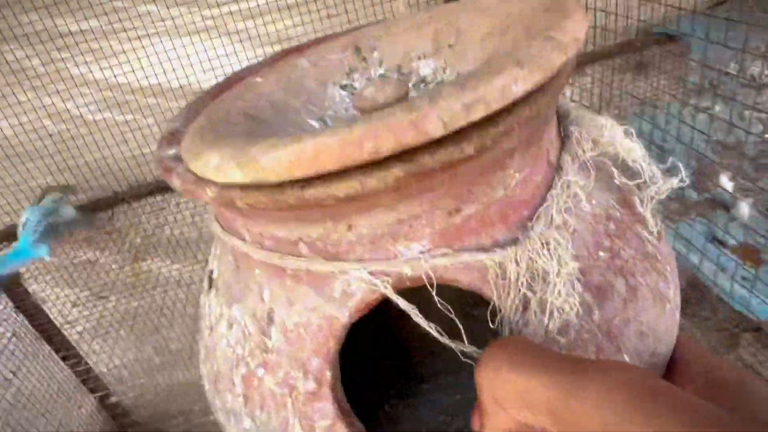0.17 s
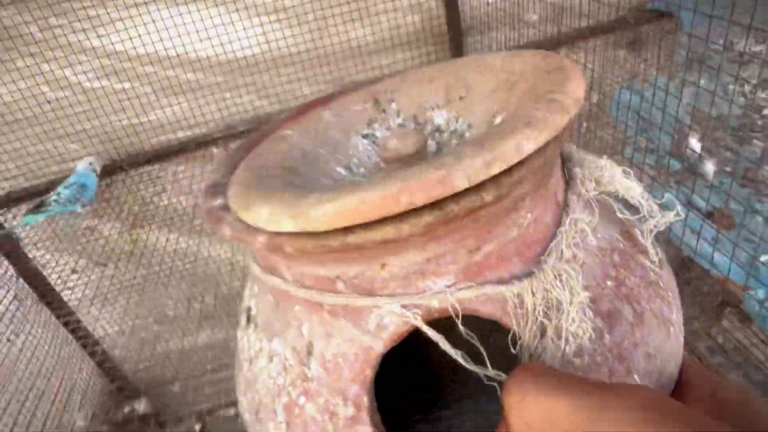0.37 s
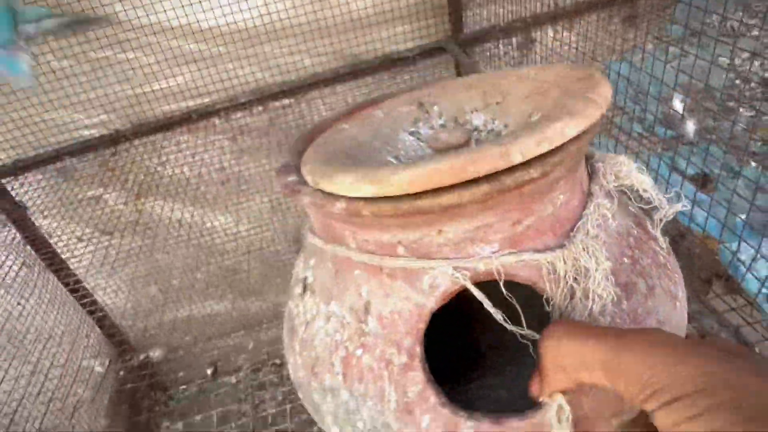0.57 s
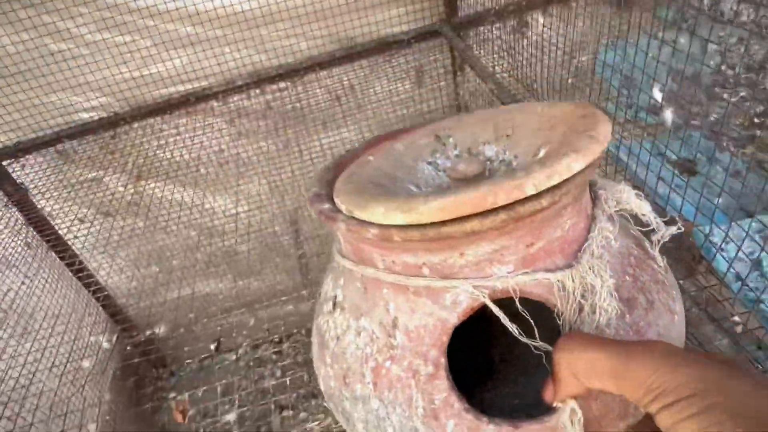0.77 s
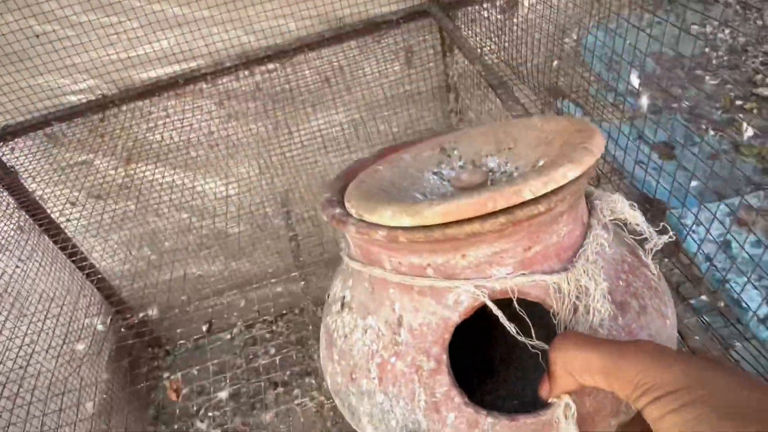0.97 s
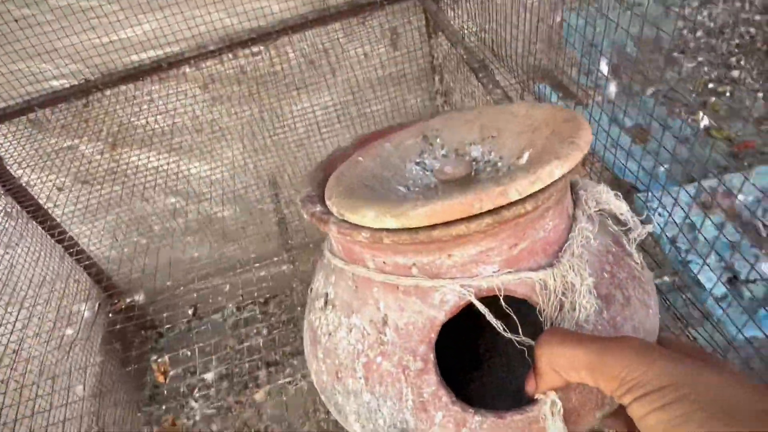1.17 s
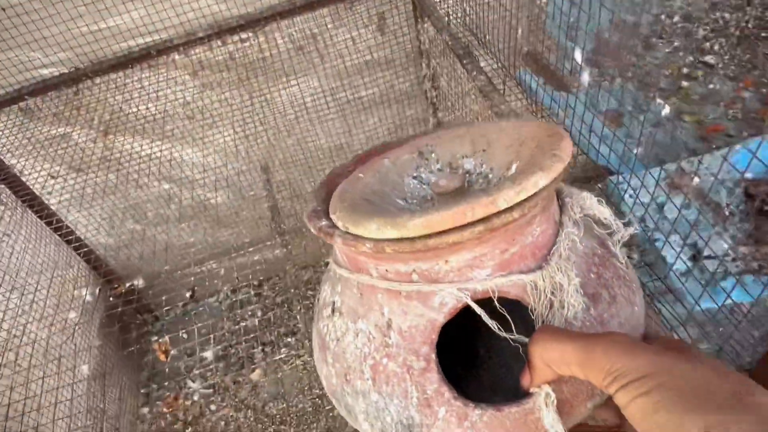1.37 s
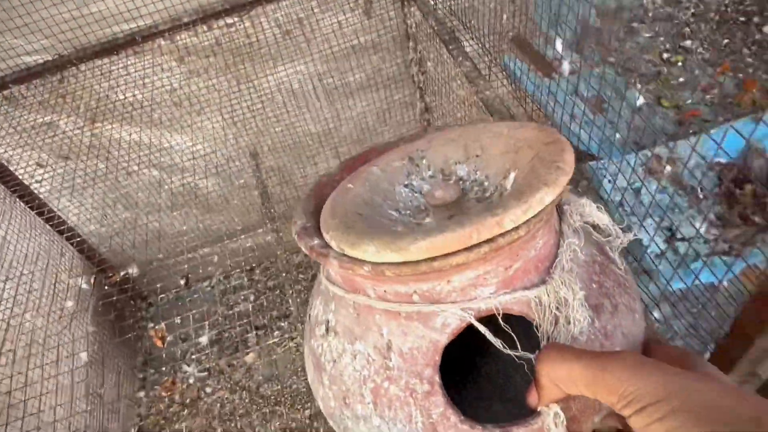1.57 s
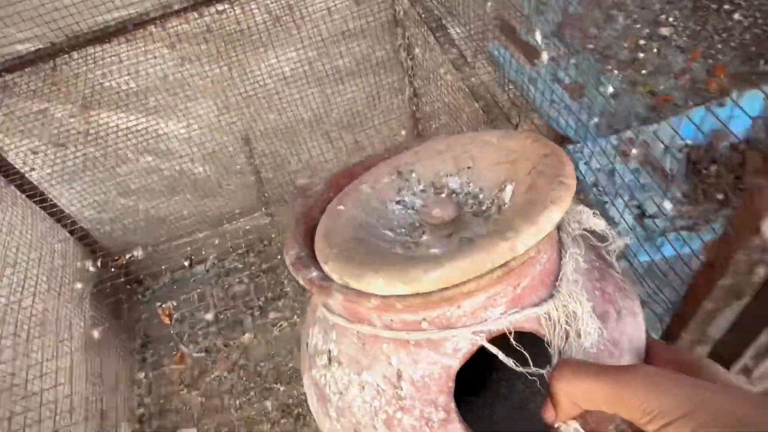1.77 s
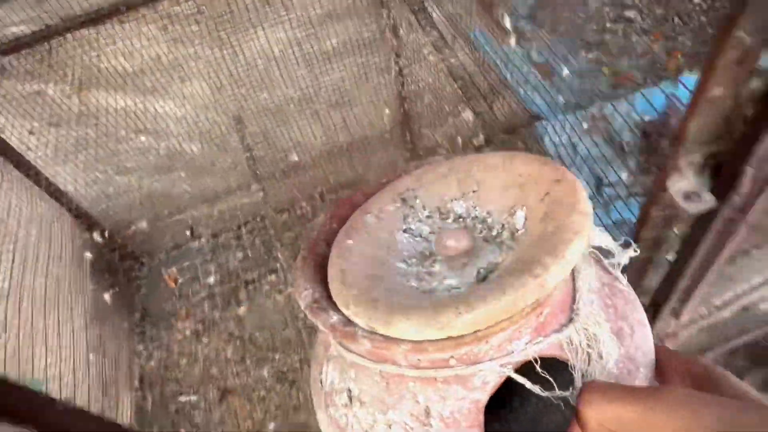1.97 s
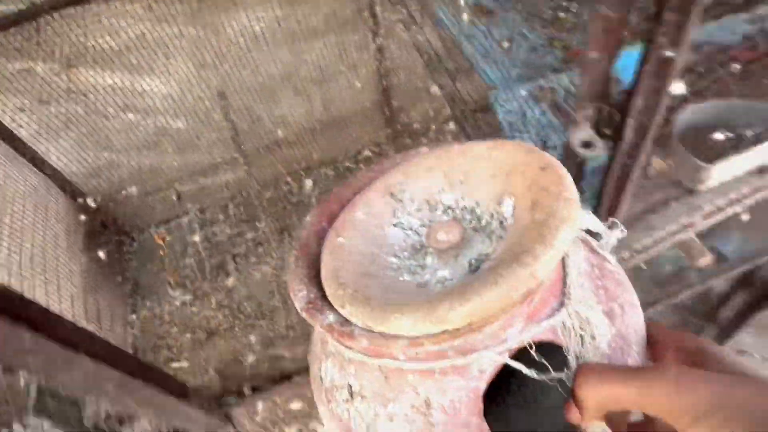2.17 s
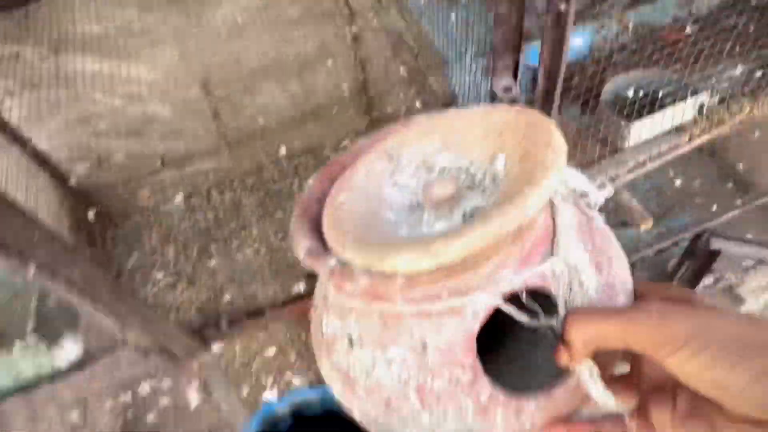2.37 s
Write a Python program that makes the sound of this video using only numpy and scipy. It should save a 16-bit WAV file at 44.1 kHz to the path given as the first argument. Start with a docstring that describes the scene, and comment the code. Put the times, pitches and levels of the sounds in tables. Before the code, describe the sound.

Chicks call from a clay pot at about 0.55, 0.9 and 1.4 seconds, each sharp high note breaking into a falling hoarse squawk; the last two start with dry rasps. Wings thrum away during 0-0.7, with scratches near 0.4. A faint chirp rises at 1.1; gritty rattling and scuffling span 1.3-1.55. Quiet outdoor air and low rumble remain, a faint tone at 1.8, a light knock at 2.27.

```python
"""In a wire aviary, chicks call three times from a clay pot over quiet outdoor air, rumble and hum.
Each call is a harmonic series that starts high (the louder two after a dry rasp of noise), breaks to a
lower register and turns hoarse as it sinks. A bird flutters away in decaying thrums at the start; another
gives a faint rising chirp. Noise makes scratches, scuffling and a resonant rattle around the third call;
a far tone sinks slightly and a light knock rings one mode."""
import sys
import numpy as np
from scipy import signal
from scipy.fft import rfft, irfft, next_fast_len
from scipy.io import wavfile
from scipy.ndimage import uniform_filter1d, minimum_filter1d

SR = 44100
rng = np.random.default_rng(int(sys.argv[2]) if len(sys.argv) > 2 else 0)


def wav_record(signal):
    """Record a signal, one row per channel, as 16-bit PCM in the file named by sys.argv[1]."""
    frames = np.transpose(np.atleast_2d(signal))
    bounded = np.clip(frames, -1, 1)
    # unit amplitude maps onto the largest positive 16-bit level
    quanta = np.round(bounded * 32767).astype(np.int16)
    wavfile.write(sys.argv[1], SR, quanta)


N = 106060
T = np.arange(N) / SR  # time in seconds
CUTOFF_HZ = 15900  # top of the audible band here
HIGH_ROUGHNESS = .08  # least hoarseness of the high notes and the chirp (0-1)

# Spectrum of rustling air and feathers. Each row: frequency in Hz, relative level in dB.
RUSTLE_COLOUR = [(120, -56), (200, -15), (289, -15.5), (366, -8), (548, -14.5), (709, -10), (3430, -20.5),
                 (6760, -18.5), (9930, -26.5), (16000, -32)]


def from_db(db):
    """Level is logarithmic: 20 dB is a tenfold amplitude."""
    return 10 ** (np.asarray(db) / 20)


def rms_one(x):
    """Normalisation by effective value: scale to unit rms."""
    return x / np.sqrt(np.mean(x ** 2) + 1e-20)


def at_hz(points, hz):
    """Interpolation of a spectrum in dB along a logarithmic frequency axis."""
    point_hz, db = np.transpose(points)
    return np.interp(np.log(np.maximum(hz, 1)), np.log(point_hz), db)


def shaped(x, gain_at):
    """Linear filtering: multiply the spectrum by a gain that depends on frequency."""
    size = next_fast_len(2 * x.shape[-1])
    hz = np.arange(size // 2 + 1) * SR / size
    return irfft(rfft(x, size) * gain_at(hz), size)[..., :x.shape[-1]]


def noise(colour, channels=1):
    """Coloured noise: white noise filtered to a spectrum that falls away past its ends, at unit rms."""
    lowest_hz, highest_hz = colour[0][0], colour[-1][0]

    def gain(hz):
        top = 1 / (1 + (hz / highest_hz / 2) ** 4)
        bottom = 1 - 1 / (1 + (2 * hz / lowest_hz) ** 4)
        return from_db(at_hz(colour, hz)) * top * bottom

    return rms_one(shaped(rng.standard_normal((channels, N)), gain))


def drift(hz):
    """Band-limited random wander: low-passed noise of unit rms."""
    low_pass = signal.butter(2, hz, fs=SR, output="sos")
    settled = signal.sosfilt(low_pass, rng.standard_normal(N + SR))[SR:]  # first second discarded
    return rms_one(settled)


def bursts(rows, rise_s):
    """Impulsive excitation: envelopes that rise quickly and decay exponentially, superposed."""
    out = 0
    for s, db, decay_s in rows:
        age = np.maximum(T - s, 0)
        rise = 1 - np.exp(-age / rise_s)
        decay = np.exp(-np.maximum(age - rise_s, 0) / decay_s)
        out = out + from_db(db) * rise * decay
    return out


def background():
    """Incoherent superposition: outdoor air, rustling hiss and low rumble as noise, plus a steady sine hum."""
    # Quiet air. Each row: frequency in Hz, relative level in dB.
    air_floor_colour = [(120, -38), (200, -18.5), (590, -3.5), (696, -21.5), (1160, -9), (2910, -13.5),
                        (9000, -33), (16000, -56)]
    # Rustling hiss. Each row: time in seconds, level in dB before wander and balance.
    hiss_level = [(0, -41.5), (.45, -45), (.75, -52.5), (1.1, -56), (1.25, -52.5), (1.6, -58.5),
                  (1.87, -62), (1.95, -52), (2.05, -58), (2.17, -57), (2.28, -55), (2.4, -59)]
    # Low rumble. Each row: time in seconds, level in dB before a common trim.
    rumble_level = [(0.0, -31.5), (0.11, -43), (0.17, -39), (0.39, -46.5), (0.51, -41.5), (0.75, -50),
                    (2.12, -54.5), (2.32, -47), (2.4, -49.5)]
    # Low rumble. Each row: frequency in Hz, relative level in dB.
    rumble_colour = [(12, -33.5), (20, -19), (54, 3.5), (113, -9.5), (193, -10.5), (255, -17), (307, -14.5),
                     (400, -17.5), (520, -18), (880, -120)]
    floor_db, rumble_trim_db = -60.5, -2.5
    hum_hz, hum_peak_db = 46.2, -50.5

    floor = from_db(floor_db) * noise(air_floor_colour, channels=2)
    hiss_db = np.interp(T, *np.transpose(hiss_level)) + 2.0 * drift(43)
    balance = from_db([[1.5], [-1.5]])  # left, right
    hiss = noise(RUSTLE_COLOUR, channels=2) * from_db(hiss_db) * balance
    # mostly common to both sides, with a weaker independent part
    rumble = noise(rumble_colour) + from_db(-10) * noise(rumble_colour, channels=2)
    rumble = rumble * from_db(np.interp(T, *np.transpose(rumble_level)) + rumble_trim_db)
    hum = from_db(hum_peak_db) * np.sin(2 * np.pi * hum_hz * T)
    return floor + hiss + rumble + hum


def wings():
    """Damped oscillation: each wing stroke is a short hollow thrum with a noisy swish of feathers."""
    # Up and down strokes. Each row: time in seconds, relative level in dB.
    wingbeats = [(0.064, -30), (0.1, -37.5), (0.15, -33.5), (0.186, -39), (0.244, -33), (0.321, -35),
                 (0.398, -34.5), (0.434, -43.5), (0.467, -37), (0.531, -38.5), (0.602, -44.5),
                 (0.666, -46.5), (0.708, -45.5)]
    thrum_hz, decay_s, rise_s = 367, 0.012, 0.0037
    thrum_db, swish_db, trim_db = 5, -10.5, -3  # the trim applies to both

    out = 0
    swish = from_db(swish_db) * noise(RUSTLE_COLOUR)[0]
    for s, db in wingbeats:
        start = s - rise_s
        thrum = from_db(thrum_db) * np.sin(2 * np.pi * thrum_hz * (T - start))
        out = out + bursts([(start, db, decay_s)], rise_s) * (thrum + swish)
    return out * from_db(trim_db)


def scratches():
    """Amplitude-modulated noise: brief broadband scratches that die away exponentially."""
    # Each row: start in seconds, level in dB, decay in seconds.
    scratch_times = [(.305, -40.5, 0.0042), (.412, -31.5, 0.0098), (.426, -38, 0.002), (.78, -55, 0.0036)]
    # Each row: frequency in Hz, relative level in dB.
    scratch_colour = [(500, 2), (2500, -8), (6000, 1.5), (9000, 0.5), (16000, 4)]
    return bursts(scratch_times, rise_s=0.0015) * noise(scratch_colour)[0]


def note(rows, roughness, gain_db):
    """Source and filter: throat-weighted harmonics with jitter, flutter and breath that grow as pitch sinks.

    The fundamental carries the high register, the second partial the low; `roughness` bounds hoarseness."""
    # Throat and beak. Each row: frequency in Hz, gain in dB before the overtones are scaled together.
    throat = [(1400, -19.5), (1700, -7), (2100, 4), (2800, -5), (3400, -3.5), (4200, -8.5), (5000, -4),
              (6300, -12), (7200, -10), (8200, -5.5), (9500, -21.5), (10600, -38), (12000, -23.5),
              (13300, -42), (15300, -28.5)]
    # Rush of air. Each row: frequency in Hz, relative level in dB.
    air_colour = [(1400, -25), (2200, -16), (3100, -3), (4000, -4), (5000, 0), (6500, -1), (8200, -5),
                  (9500, -13), (11000, -25), (15300, -30)]
    attack_s, release_s = .004, .005
    sag_octaves_per_s = 9.9  # the pitch drops as a note lets go
    hoarse_below_hz, hoarse_span_hz = 2046, 400
    jitter_clear, jitter_hoarse, jitter_rate_hz = .004, .032, 210  # fractions of the pitch
    grain_clear, grain_hoarse, grain_rate_hz = .08, .26, 230  # flutter depth per harmonic number
    air_clear_db, air_hoarse_db = -32, -9  # relative to the overtones
    shimmer_db = 0.5  # rms wander of the level
    fundamental_db = 2.5  # extra weight on the low note's fundamental

    s, *columns = np.transpose(rows)
    hz, db, edge_db, *below_db = [np.interp(T, s, c) for c in columns]
    after = np.clip(T - s[-1], 0, None)
    attack = np.clip((T - s[0]) / attack_s + 1, 0, 1)
    gate = attack * np.exp(-after / release_s)
    hz = hz * 2 ** (-sag_octaves_per_s * after)
    hoarse = np.clip((hoarse_below_hz - hz) / hoarse_span_hz, *roughness)
    jitter = (jitter_clear + jitter_hoarse * hoarse) * drift(jitter_rate_hz)
    phase = 2 * np.pi * np.cumsum(hz * (1 + jitter)) / SR

    on = gate > 1e-4
    k = np.arange(1, 11)[:, None]  # harmonic numbers
    main = len(below_db)  # index of the carrying partial
    gains = from_db(at_hz(throat, k * hz[on])) * (k * hz[on] < CUTOFF_HZ)
    gains[main + 1:] *= from_db(edge_db[on]) / np.linalg.norm(gains[main + 1:], axis=0)
    gains[main] = 1
    if below_db:
        gains[0] = from_db(below_db[0][on] + fundamental_db)

    air_gain = from_db(air_clear_db) + from_db(air_hoarse_db) * hoarse
    out = air_gain * from_db(edge_db) * noise(air_colour)[0]

    # each partial flutters on its own in amplitude and phase, the higher ones more
    depth = k * (grain_clear + grain_hoarse * hoarse[on])
    white = rng.standard_normal((2, len(k), SR // 2))
    low_pass = signal.butter(2, grain_rate_hz, fs=SR, output="sos")
    wander = rms_one(signal.sosfilt(low_pass, white))[..., :on.sum()]
    complex_wander = (wander[0] + 1j * wander[1]) / np.sqrt(2)
    flutter = (1 + depth * complex_wander) / np.sqrt(1 + depth ** 2)
    partials = gains * flutter * np.exp(1j * k * phase[on])
    out[on] += np.sqrt(2) * partials.real.sum(0)
    return out * gate * from_db(db + gain_db + shimmer_db * drift(100))


def call_colour(hz):
    """Band-stop and high-pass filtering: the calls are thin in one narrow band and have no bass."""
    notch_hz, notch_width_hz, low_cut_hz = 2490, 190, 1250
    off = ((hz - notch_hz) / notch_width_hz) ** 4
    notch = off / (1 + off)
    low_cut = 1 - 1 / (1 + (hz / low_cut_hz) ** 10)
    return notch * low_cut


def chicks():
    """Register break: high notes give way to low ones, and noise bursts form the opening rasps."""
    # High note of each call. Each row: time in seconds, pitch in Hz, level in dB before gain and shimmer,
    # overtones in dB relative to that level.
    high_notes = [
        [(0.534, 3297, -25, -15.5), (0.558, 3256, -26.5, -10.5), (0.564, 3090, -21, -17),
         (0.572, 3235, -28, 1.5), (0.583, 3094, -21, -21.5)],
        [(0.879, 3164, -24.5, -6), (0.893, 3304, -19.5, -10), (0.915, 3010, -21.5, 3),
         (0.937, 2763, -11, -15.5), (0.942, 2774, -28.5, 7.5)],
        [(1.43, 3160, -22.5, -5.5), (1.446, 3198, -19.5, -4), (1.458, 2973, -19, -6),
         (1.466, 2857, -21.5, -13.5), (1.477, 2820, -17, -12)],
    ]
    # Low note after the break. Each row: time in seconds, pitch in Hz, second partial in dB before gain
    # and shimmer, then overtones and fundamental (before its extra weight) in dB relative to that partial.
    low_notes = [
        [(0.586, 2252, -49, -24, 18), (0.592, 2239, -32, -0.5, 13.5), (0.604, 2162, -18, -16, -3.5),
         (0.624, 1974, -38, -4.5, 11), (0.636, 1766, -21.5, -10, -18.5), (0.658, 1640, -28.5, -2, -3.5),
         (0.672, 1634, -28, -7.5, -10.5), (0.69, 1550, -35.5, -7, -3.5)],
        [(0.945, 2148, -24.5, -8.5, 4.5), (0.973, 2006, -16, 1, -5.5), (0.985, 1959, -16, -13.5, -6.5),
         (0.997, 1946, -21, -4, -2.5), (1.005, 1788, -10.5, -8, -24), (1.019, 1582, -18, -7, -12),
         (1.027, 1404, -23.5, -10.5, -17.5)],
        [(1.481, 2095, -21, -12, -10), (1.499, 1998, -18.5, -7.5, -8.5), (1.525, 1939, -25, 5, 7),
         (1.543, 1726, -10, -21, -45), (1.549, 1746, -15.5, -9.5, -10.5), (1.561, 1510, -21, -4.5, -17),
         (1.572, 1344, -22, -15, -16)],
    ]
    # Hoarseness of each low note. Each row: least and greatest value (0-1).
    low_roughness = [(0, .9), (.12, .5), (.28, .5)]
    # Dry rasps. Each row: start in seconds, level in dB, decay in seconds.
    rasp_times = [(.863, -25, 0.0077), (.872, -19.5, 0.0027), (1.407, -24, 0.011), (1.413, -25, 0.011),
                  (1.423, -23.5, 0.023)]
    # Dry rasps. Each row: frequency in Hz, relative level in dB.
    rasp_colour = [(200, -54), (500, -15.5), (950, -13), (1500, -0.5), (2000, 2.5), (2600, -3), (3300, 2),
                   (4200, -14.5), (5100, -4.5), (6400, -15), (8000, -12.5), (16000, -41)]

    high = sum(note(rows, (HIGH_ROUGHNESS, 1), gain_db=1.0) for rows in high_notes)
    low = sum(note(rows, rough, gain_db=-0.5) for rows, rough in zip(low_notes, low_roughness))
    rasps = bursts(rasp_times, rise_s=.002) * noise(rasp_colour)[0]
    return shaped(high + low, call_colour) + rasps


def faint_chirp():
    """Frequency glide: another bird's harmonic note rises in pitch."""
    # Each row: time in seconds, pitch in Hz, level in dB before gain and shimmer,
    # overtones in dB relative to that level.
    chirp_rows = [(1.058, 2200, -47, -18), (1.081, 2290, -44, -14), (1.085, 2350, -36, -24),
                  (1.097, 2430, -37, -20), (1.103, 3050, -43, -15), (1.11, 3400, -42, -15)]
    return note(chirp_rows, (HIGH_ROUGHNESS, 1), gain_db=3.0)


def scuffle():
    """Amplitude-modulated noise: soft, uneven scuffling, equally strong on both sides."""
    # Each row: time in seconds, level in dB before the uneven wander and the sum of both parts.
    scuffle_level = [(1.15, -68), (1.3, -52), (1.5, -49.5), (1.6, -68), (1.8, -64.5)]
    # Each row: frequency in Hz, relative level in dB.
    scuffle_colour = [(150, -0.5), (260, -16), (1000, -5), (3000, -17)]
    level_db = np.interp(T, *np.transpose(scuffle_level), left=-120, right=-120) + 3 * drift(65)
    shared = noise(scuffle_colour)
    separate = from_db(-1.5) * noise(scuffle_colour, channels=2)
    return from_db(level_db) * (shared + separate)


def rattle():
    """Resonance: about forty gritty pulses a second, coloured by a few broad hollow modes."""
    # Each row: start in seconds, level in dB at the left.
    rattle_pulses = [(1.276, -57), (1.307, -42), (1.334, -47), (1.358, -29.5), (1.383, -25.5),
                     (1.407, -30.5), (1.433, -30), (1.455, -31), (1.48, -27), (1.507, -32), (1.531, -31)]
    # Each row: frequency in Hz, width of one filter pass in Hz, relative level in dB.
    resonances = [(950, 400, 1), (1950, 480, 1), (3120, 500, -9), (5070, 600, -7), (6700, 1100, -14.5)]
    decay_s, right_db = .0075, -5

    grit = rng.standard_normal(N)
    pulses = bursts([(s, db, decay_s) for s, db in rattle_pulses], rise_s=0.0037)
    rung = 0
    for k, (hz, width_hz, db) in enumerate(resonances):
        b, a = signal.iirpeak(hz, hz / width_hz, fs=SR)
        mode = signal.lfilter(b, a, signal.lfilter(b, a, grit))
        rung = rung + (-1) ** k * from_db(db) * mode  # neighbours in opposite sign
    return pulses * rms_one(rung) * from_db([[0], [right_db]])


def faint_tone():
    """Pure tone: a far sine whose phase accumulates a slightly sinking frequency."""
    # Each row: time in seconds, pitch in Hz, peak level in dB.
    tone_rows = [(1.6, 630, -62), (1.76, 590, -66.5), (1.795, 597, -51), (1.818, 540, -62)]
    s, hz, db = np.transpose(tone_rows)
    outside_s = np.abs(T - np.clip(T, s[0], s[-1]))
    level_db = np.interp(T, s, db) - 600 * outside_s  # fades at 600 dB per second
    phase = 2 * np.pi * np.cumsum(np.interp(T, s, hz)) / SR
    return from_db(level_db) * np.sin(phase)


def knock():
    """Impact excitation: a light tap rings one short mode over a dull noise thud."""
    # Each row: start in seconds, level in dB, decay in seconds.
    knock_times = [(2.269, -32.5, 0.0064)]
    # Dull thud. Each row: frequency in Hz, relative level in dB.
    thud_colour = [(300, 3), (1000, 4), (2200, -8), (6000, -35)]
    mode_hz, thud_db = 1330, -14.5
    ring = np.sin(2 * np.pi * mode_hz * T)
    thud = from_db(thud_db) * noise(thud_colour)[0]
    return bursts(knock_times, rise_s=0.00091) * (ring + thud)


def tail(x, t60):
    """Diffuse reverberation: convolve with decaying noise of unit energy, different at each ear."""
    t = np.arange(int(t60 * SR)) / SR
    response = rng.standard_normal((2, len(t))) * from_db(-60 * t / t60)
    response = response / np.linalg.norm(response, axis=1, keepdims=True)
    return signal.fftconvolve(x[None], response, axes=1)[:, :N]


def to_left(near):
    """Interaural differences: near sounds arrive sooner and, at most frequencies, louder at the left."""
    # Each row: frequency in Hz, left minus right in dB.
    left_lead = [(60, 1), (500, 7.5), (1000, 6), (1600, 5), (2050, 4.5), (2800, 9.5), (4200, 14),
                 (5500, 14.5), (8000, 12.5), (10500, -5.5), (16000, 2)]
    right_lag_s = .000185

    def ears(hz):
        half_db = at_hz(left_lead, hz) / 2
        right = from_db(-half_db) * np.exp(-2j * np.pi * hz * right_lag_s)
        return np.array([from_db(half_db), right])

    return shaped(near, ears)


def scene():
    """Direct and reflected sound: calls ring in the pot and off the walls; near sounds fill the aviary."""
    # Colour of the aviary's reverberation. Each row: frequency in Hz, gain in dB.
    aviary_colour = [(300, 11), (2000, -4.5), (3500, -3.5), (5000, 0.5), (8000, -12), (12000, -37)]
    pot_t60_s, pot_db = .017, -14
    walls_t60_s, walls_left_db, walls_right_db = .125, -7, -9
    aviary_t60_s, aviary_send_db, chirp_send_db = 0.52, -18.5, -30
    aviary_left_db = 2.5  # raised at the left and lowered as much at the right

    calls = chicks()
    chirp = faint_chirp()
    small = wings() + scratches() + knock()
    potted = calls + from_db(pot_db) * tail(calls, pot_t60_s)[0]
    walls = from_db([[walls_left_db], [walls_right_db]]) * tail(calls + from_db(9) * chirp, walls_t60_s)
    send = from_db(aviary_send_db) * (calls + small) + from_db(chirp_send_db) * chirp
    space = shaped(tail(send, aviary_t60_s), lambda hz: from_db(at_hz(aviary_colour, hz)))
    space = space * from_db([[aviary_left_db], [-aviary_left_db]])
    near = to_left(potted + chirp + small)
    return near + rattle() + scuffle() + walls + space + background() + faint_tone()


def record(dry):
    """Peak limiting: a quick gain, common to both sides, holds peaks under full scale; the top is cut."""
    ceiling = .88
    gain = ceiling / np.maximum(np.abs(dry).max(axis=0), ceiling)
    gain = uniform_filter1d(minimum_filter1d(gain, size=177), size=177)  # windows in samples
    return shaped(dry * gain, lambda hz: np.clip((CUTOFF_HZ - hz) / 200 + .5, 0, 1))


dry = scene()
out = record(dry)
wav_record(out)
```